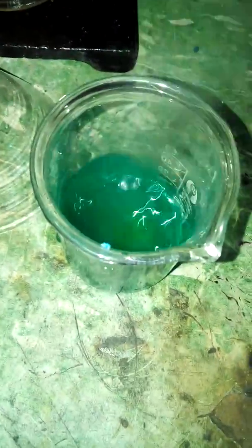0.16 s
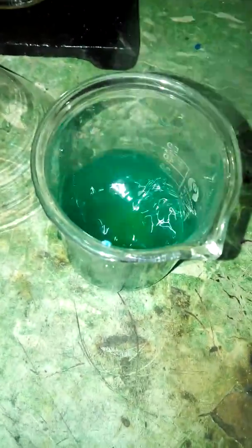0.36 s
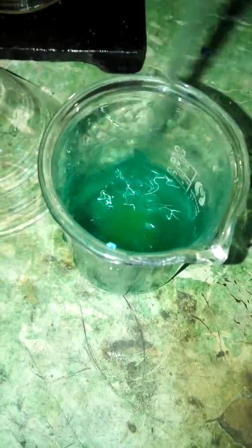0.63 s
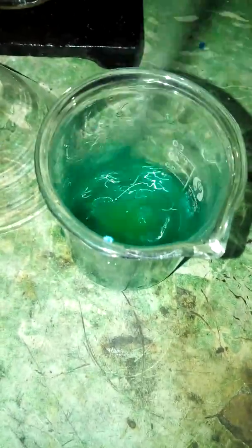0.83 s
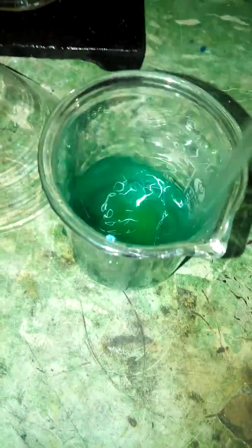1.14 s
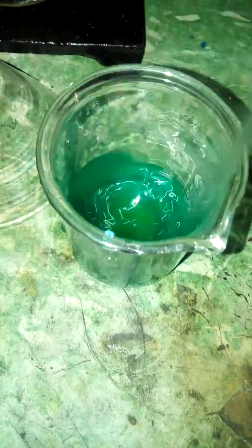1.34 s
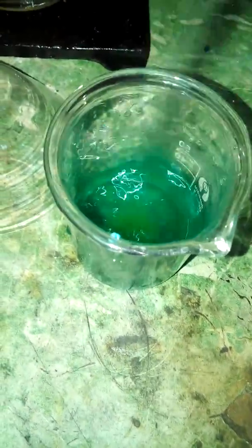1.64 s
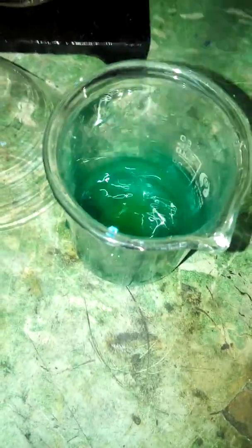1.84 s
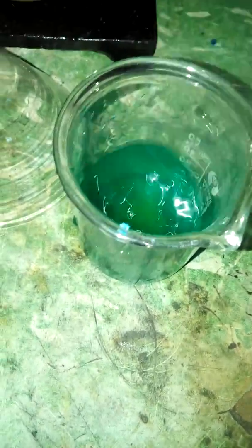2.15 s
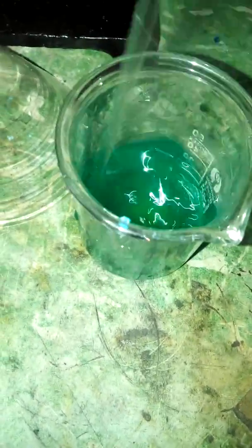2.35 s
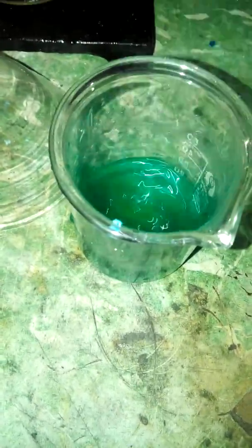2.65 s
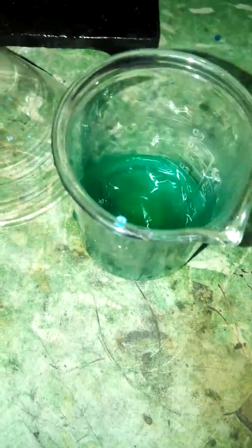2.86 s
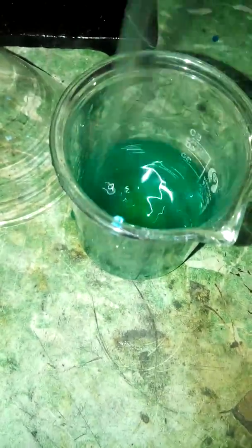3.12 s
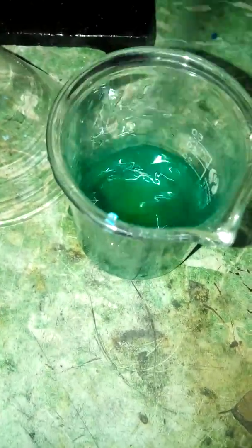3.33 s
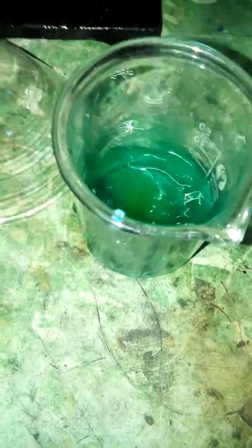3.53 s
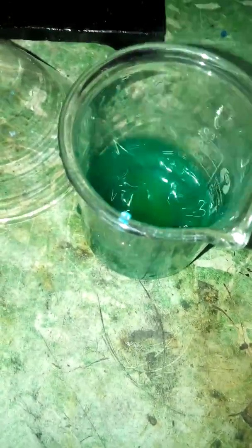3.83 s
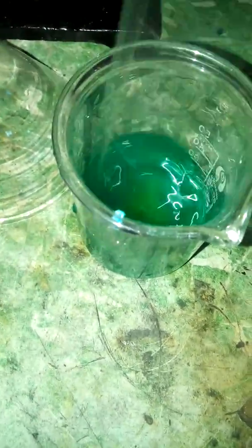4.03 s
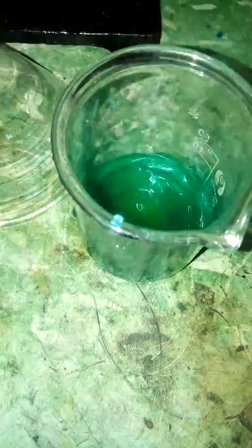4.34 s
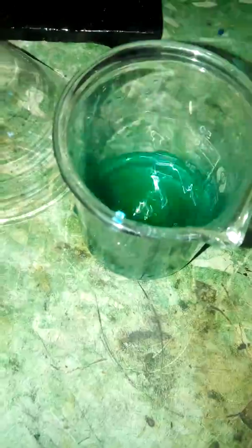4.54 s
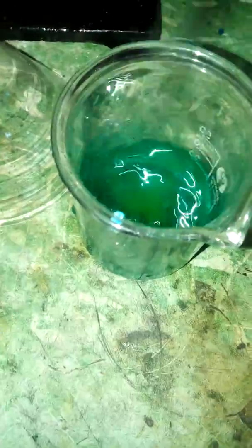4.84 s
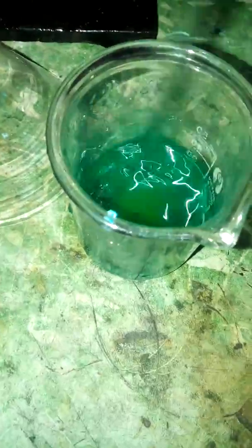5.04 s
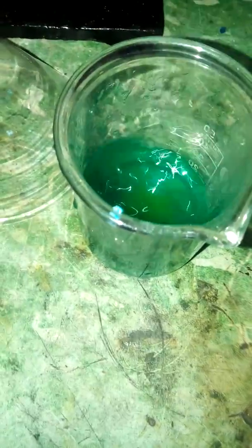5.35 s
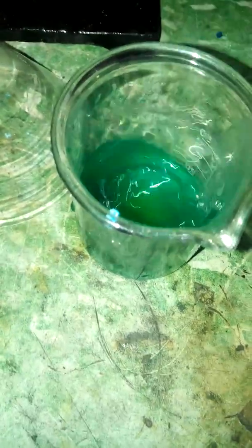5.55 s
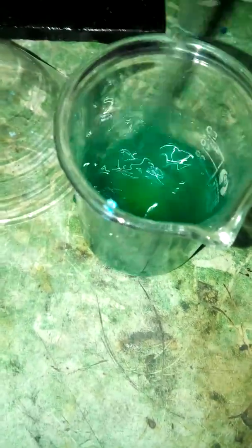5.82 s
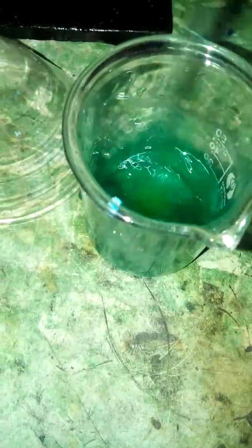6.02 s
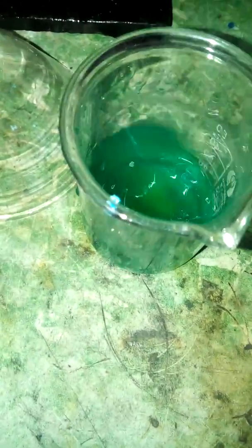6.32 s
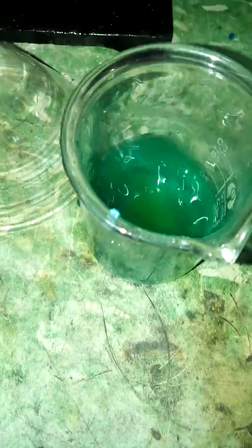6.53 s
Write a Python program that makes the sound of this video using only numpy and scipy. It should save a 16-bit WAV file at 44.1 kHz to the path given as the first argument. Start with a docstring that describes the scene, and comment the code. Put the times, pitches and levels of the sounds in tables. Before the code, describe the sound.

A rod clinks quickly and irregularly against a small glass beaker as liquid is stirred, with soft sloshing, bubbly plips and glassy rubbing.

```python
"""A rod stirs a solution in a small glass beaker on a stone counter, close by in a small quiet room.
From the start the rod clinks on the wall: damped glass modes and a crack, with rebounds after hard blows.
Between blows it rubs, slides and squeaks by tiny slips; the liquid sloshes, and trapped bubbles ring as they rise.
At 0.7, 2.3 and 2.6 s the foot knocks on the counter with a dull thud; just before 2.6 s come two clear squeaks.
The hardest blows fall near 2.4 and 3.5 s, and the rubbing is strongest near 6 s."""
import sys
import numpy as np
from scipy import signal
from scipy.fft import rfft, irfft
from scipy.io import wavfile

SR = 44100
rng = np.random.default_rng(int(sys.argv[2]) if len(sys.argv) > 2 else 0)


def unload_audio(sound):
    """Save the sound as a 16-bit wav file, at the path given as the first command line argument."""
    columns = np.transpose(np.atleast_2d(sound))
    # keep every value between -1 and 1, then stretch to whole-number steps
    steps = np.round(np.clip(columns, -1, 1) * 32767)
    wavfile.write(sys.argv[1], SR, steps.astype(np.int16))


N = 294588
EDGE_HZ = 16000  # upper limit of the band


def amp(db):
    """Decibel law: a level in dB as an amplitude ratio."""
    return 10 ** (np.asarray(db) / 20)


def evened(x):
    """Normalization to an rms of 1."""
    return x / np.sqrt(np.mean(x ** 2) + 1e-20)


def read(points, hz):
    """Interpolation of a spectrum on a log-frequency axis."""
    f, value = np.transpose(points)
    return np.interp(np.log(hz + 1), np.log(f + 1), value)


def curve(rows, axis=1):
    """Linear interpolation in dB: one column of a level curve, as a gain for every sample."""
    rows = np.array(rows)
    return amp(np.interp(np.arange(N) / SR, rows[:, 0], rows[:, axis]))


def add(mix, s, sound):
    """Superposition: adds a sound to the mix, in place, from time s [s]."""
    part = mix[max(round(s * SR), 0):][:len(sound)]
    part += sound[:len(part)]


def noise(spectrum, size):
    """Spectral shaping: white noise weighted by a spectrum, of rms 1."""
    weight = amp(read(spectrum, np.fft.rfftfreq(size, 1 / SR)))
    return evened(irfft(rfft(rng.standard_normal(size)) * weight, size))


def drift(rate_hz):
    """Low-pass random process: a wander of rms 1, slower than about rate_hz."""
    weight = np.exp(-(np.fft.rfftfreq(N, 1 / SR) / rate_hz) ** 2)
    return evened(irfft(rfft(rng.standard_normal(N)) * weight, N))


# the spectrum of the quiet air: (frequency [Hz], relative density [dB per Hz])
AIR_SPECTRUM = [(20, -29), (50, -5.5), (110, -2), (165, 6.5), (260, -1.5), (500, -20), (1000, -7),
                (2000, -40), (4500, -44), (9000, -40), (16000, -47)]


def air(level_db=-64):
    """Stationary random noise: the steady coloured hush of the room."""
    return amp(level_db) * noise(AIR_SPECTRUM, N)


# the reverberation time of the room: (frequency [Hz], t60 [s])
ROOM_DECAY = [(200, 0.5), (1400, 0.24), (3500, 0.34), (9000, 0.19), (15000, 0.19)]


def room(x, wet_db=-12, gap_s=0.001):
    """Reverberation: dense random echoes that die at a rate set by frequency."""
    echoes_per_s = 4000
    taps = rng.standard_normal(SR // 2) * (rng.random(SR // 2) < echoes_per_s / SR)
    hz, t, z = signal.stft(taps, SR, nperseg=256)
    decay = amp(-60 * t / read(ROOM_DECAY, hz)[:, None])
    tail = signal.istft(z * decay, SR, nperseg=256)[1]
    tail *= 1 - np.exp(-(np.arange(len(tail)) / SR / gap_s) ** 2)  # the echoes set in after the direct sound
    return x + amp(wet_db) * signal.fftconvolve(x, tail / np.linalg.norm(tail))[:N]


# the stirring rhythm: two strokes to a turn, the hand slowly speeding up
FIRST_STROKE_S, STROKE_S, QUICKEN_S_PER_STROKE = .176, .199, .00037


def strokes(count=34):
    """Uniformly quickening rhythm: the stroke times that pace the swirl [s]."""
    k = np.arange(count)
    return FIRST_STROKE_S + STROKE_S * k - QUICKEN_S_PER_STROKE * k ** 2 / 2


def swirl(depth_db=2.5, lead_turns=0.023):
    """Periodic modulation: the liquid surges once in every turn, a gain for every sample."""
    times = strokes()
    turns = np.interp(np.arange(N) / SR, times, np.arange(len(times)) / 2)
    return amp(-depth_db * np.cos(2 * np.pi * (turns + lead_turns)))


# the spectrum of the wash: (frequency [Hz], relative density [dB per Hz])
SLOSH_SPECTRUM = [(50, -42), (150, -1.5), (260, -4.5), (600, 3), (1100, -4), (1800, -7.5), (3000, -11.5),
                  (6000, -19)]
# how hard the stirring is: (time [s], relative level of rubbing [dB], relative level of sloshing [dB])
STIRRING = [(0.0, -57.5, -60), (0.59, -50, -61), (1.17, -47.5, -60.5), (1.43, -50.5, -61.5),
            (1.8, -51, -62), (2.25, -58.5, -62.5), (2.51, -49.5, -55), (2.88, -46, -65), (3.42, -53.5, -63),
            (3.89, -58, -66), (5.02, -56, -65.5), (5.71, -57, -67), (5.99, -44, -60), (6.36, -56, -65),
            (6.68, -55, -61)]


def slosh(wash_db=-3, lumps_db=3.5, gurgle_db=-3, per_s=4, cycles=6, count=24):
    """Turbulence and bubble resonance: a lumpy wash and many faint gurgles of all sizes."""
    wash = evened(noise(SLOSH_SPECTRUM, N) * amp(lumps_db * drift(16)))
    gurgle, t = np.zeros(N), np.arange(SR // 10) / SR
    for hz in np.geomspace(280, 4000, count):
        sizes = amp(1.4 * rng.standard_normal(N).clip(-2, 2))
        pops = (rng.random(N) < per_s / SR) * sizes
        age = hz * t / cycles
        rising_tone = np.sin(2 * np.pi * hz * t * (1 + 2 * t))
        gurgle += signal.oaconvolve(pops, age * np.exp(-2 * age) * rising_tone)[:N]
    return curve(STIRRING, axis=2) * swirl() * (amp(wash_db) * wash + amp(gurgle_db) * evened(gurgle))


# bubbles trapped behind the rod, from high plips to deep gulps:
# (onset [s], relative level [dB], starting pitch [Hz])
TRAPPED_BUBBLES = [(0.092, -45, 1500), (0.1735, -44, 1067), (0.2167, -44, 1620), (0.376, -30, 1340),
                   (0.392, -34, 1280), (0.5554, -37, 1590), (0.5662, -28, 1470), (0.753, -40, 1500),
                   (0.9667, -38.5, 1026), (1.9041, -34.5, 1497), (1.9614, -25.5, 1527), (2.241, -44, 215),
                   (2.3426, -32, 1506), (2.3697, -27, 1370), (2.558, -44.5, 401), (2.6574, -28.5, 1706),
                   (3.333, -31.5, 1626), (4.0752, -38.5, 1038), (5.224, -42, 1050), (5.4164, -28, 1400),
                   (5.42, -36, 1030), (5.6244, -43, 1103), (5.748, -46, 500), (6.104, -48, 536),
                   (6.549, -31, 1450)]


def bubbles(level_db=0.5, rise_cycles=2, satellite_db=-13, lag_s=0.045, count=4):
    """Bubble resonance: a damped tone rises as the bubble nears the surface, with fainter splashes around it."""
    out, t = np.zeros(N), np.arange(SR // 8) / SR
    life_cycles, glide_per_s = 9, 5  # decay to 1/e; relative rise in pitch
    for s, db, hz in TRAPPED_BUBBLES:
        group = [(s, hz, db)]
        for lag, pitch in rng.random((count, 2)):
            group.append((s + lag_s * (lag - .15), hz * 2 ** (.8 * pitch - .35), db + satellite_db))
        for start, pitch_hz, size_db in group:
            turns = pitch_hz * (t + glide_per_s * t ** 2 / 2)
            shape = (1 - np.exp(-turns / rise_cycles)) * np.exp(-turns / life_cycles)
            shape *= 1 - t / t[-1]
            add(out, start, amp(size_db + level_db) * shape * np.sin(2 * np.pi * turns))
    return out


def ring(modes, t, detune, scatter_db):
    """Modal synthesis: dying sines, heights of norm 1.

    Where the blow lands changes each mode's share, and the moving liquid its pitch."""
    hz, db, t60 = np.transpose(modes)[:, :, None]
    share, shift, phase = rng.standard_normal((3, len(modes), 1))
    height = amp(db + scatter_db * share)
    tones = np.sin(2 * np.pi * (hz * (1 + detune * shift) * t + phase))
    waves = np.exp(-np.log(1000) * t / t60) * tones
    return (height * waves).sum(0) / np.linalg.norm(height)


# each rebound comes sooner and softer
BOUNCE_S, BOUNCE_SHRINK, BOUNCE_DB = .0125, 0.62, -12.5


def bounces(uneven=.2, count=2):
    """Inelastic rebound: pairs of (delay [s], level relative to the blow [dB])."""
    k = np.arange(count)
    gaps = BOUNCE_S * BOUNCE_SHRINK ** k * np.exp(uneven * rng.standard_normal(count))
    return zip(np.cumsum(gaps), BOUNCE_DB * (k + 1))


# the beaker's foot on the counter: (onset [s], relative level of glass [dB], relative level of thud [dB])
FOOT_KNOCKS = [(0.6894, -35.5, -47), (2.293, -42, -58), (2.6275, -29.5, -33)]
# the modes of the foot: (nominal frequency [Hz], relative level [dB], t60 [s])
FOOT_MODES = [(1110, -9, 0.028), (1860, 0, 0.024), (2760, -5, 0.018), (3850, -7, 0.028)]
# the counter's answer: (frequency [Hz], relative density [dB per Hz])
THUD_SPECTRUM = [(30, -50), (200, -20), (560, 0), (780, -1.5), (1200, -9), (5000, -28)]


def knocks(level_db=6, thud_s=0.007, rise_s=0.00074):
    """Impact of glass on stone: damped foot modes and a dull thud, repeated as the beaker rocks."""
    out, t = np.zeros(N), np.arange(SR // 10) / SR
    onset = 1 - np.exp(-t / rise_s)
    for s, glass_db, thud_db in FOOT_KNOCKS:
        for delay, drop in [(0, 0), *bounces()]:
            thud = amp(thud_db) * noise(THUD_SPECTRUM, len(t)) * np.exp(-t / thud_s)
            foot = amp(glass_db) * ring(FOOT_MODES, t, detune=0.02, scatter_db=1.5)
            add(out, s + delay, amp(drop + level_db) * onset * (foot + thud))
    return out


# the beaker's modes, two of the rim, two of the wall, then the damped high ones; the spout splits
# the rim and wall modes into beating pairs: (nominal frequency [Hz], level within the family [dB], t60 [s])
GLASS_MODES = [(2576, -1.5, 0.25), (2614, -1.5, 0.22), (6470, 5.5, 0.1), (6408, -8, 0.16),
               (2772, -17.5, 0.027), (3620, -20, 0.03), (5120, -14, 0.016), (5823, -14.5, 0.034),
               (7384, 4, 0.017), (7500, 3.5, .018), (8940, -9.5, 0.051), (9540, 7, 0.028),
               (10150, -1, 0.024), (10600, -1, 0.02), (11450, -12.5, 0.027), (12250, -7, 0.026),
               (13630, -17, 0.029), (14300, -12.5, 0.025)]


def rim(t):
    """Beating of near-degenerate modes: the slow pair of the rim."""
    return ring(GLASS_MODES[:2], t, detune=.0035, scatter_db=3)


def wall(t):
    """Beating of near-degenerate modes: the higher pair of the wall."""
    return ring(GLASS_MODES[2:4], t, detune=.005, scatter_db=3)


# the crack of the contact itself: (frequency [Hz], relative density [dB per Hz])
CRACK_SPECTRUM = [(200, -40), (900, -31), (1900, -15), (3500, -10.5), (4400, -15.5), (5400, -2.5),
                  (6700, 0), (7500, 5.5), (10000, 1.5), (12600, -5.5), (16000, -9.5)]
TICK_HZ = 9000  # reference for the favoured pitch: the boost grows below it


def tick(favoured_hz=None, crack_db=-4.5, crack_s=0.0027, rise_s=0.00016, favour_db=6, octaves=.25):
    """Impact excitation: damped high modes and a crack, stronger near the pitch the contact point favours."""
    t = np.arange(SR // 16) / SR
    modes = np.array(GLASS_MODES[4:])
    if favoured_hz:
        nearness = np.exp(-(np.log2(modes[:, 0] / favoured_hz) / octaves) ** 2)
        modes[:, 1] += favour_db * nearness * (TICK_HZ / favoured_hz) ** .5
    glass = ring(modes, t, detune=.008, scatter_db=3.5)
    crack = amp(crack_db) * noise(CRACK_SPECTRUM, len(t)) * np.exp(-t / crack_s)
    sound = (glass + crack) * (1 - np.exp(-t / rise_s))
    return sound / np.sqrt(2 * np.mean(sound[:SR // 250] ** 2))  # as strong as a unit sine over 4 ms


def contact(flight_s=.04, hard_db=-24, flight_db=-12):
    """Loss of contact: before each hard blow the rod swings nearly free, a gain for the friction sounds."""
    touching = np.ones(N)
    for s, bright, *_ in ROD_BLOWS:
        if bright > hard_db:
            touching[max(int((s - flight_s) * SR), 0):int(s * SR)] = amp(flight_db)
    return touching


# the clear squeaks of the wet rod: (middle [s], frequency [Hz], level before contact gain [dB], length [s])
CLEAR_SQUEAKS = [(2.552, 9400, -21.5, 0.0082), (2.558, 9640, -24, 0.013)]


def squeaks(level_db=0, waver=.006, faint_db=-49, count=70):
    """Stick-slip oscillation: short tones at high modes, two clear and many faint, while the rod touches."""
    out, wobble = np.zeros(N), drift(300)
    high_hz = np.array(GLASS_MODES)[9:13, 0]
    tones = list(CLEAR_SQUEAKS)
    for when, mode, off, size, span in rng.random((count, 5)):
        hz = high_hz[int(mode * len(high_hz))] * (.98 + .04 * off)
        tones.append((when * (N / SR - .1), hz, faint_db + 12 * (size - .5), .003 + .006 * span))
    for s, hz, db, length in tones:
        size = int(length * SR)
        turns = np.cumsum(hz * (1 + waver * wobble[int(s * SR):][:size])) / SR
        add(out, s - length / 2, amp(db + level_db) * np.hanning(size) * np.sin(2 * np.pi * turns))
    return out * contact()


# the gritty slides of the wet rod: (middle [s], centre frequency [Hz], relative level [dB])
GRITTY_SLIDES = [(.657, 3100, -44), (.874, 3100, -46), (1.111, 6240, -39.5), (1.278, 3000, -48),
                 (2.167, 8370, -39), (2.336, 4000, -47), (3.19, 6640, -48.5), (3.325, 6400, -53),
                 (3.69, 8000, -52), (3.892, 8500, -45), (4.075, 9000, -45.5), (4.25, 7500, -47),
                 (4.45, 8500, -46), (4.635, 9300, -49), (5.897, 2900, -45), (6.296, 8300, -43),
                 (6.48, 4300, -47)]


def slides(level_db=-1.5, octaves=0.28, life_s=0.0005, glass_db=0, count=40):
    """Granular friction: a spatter of tiny damped tones that also sets the high modes tinkling."""
    out, t = np.zeros(N), np.arange(SR // 40) / SR
    length_s = .026
    for s, centre_hz, db in GRITTY_SLIDES:
        spatter = np.zeros(SR // 10)
        for when, pitch, size in rng.standard_normal((count, 3)).clip(-2, 2):
            hz = min(centre_hz * 2 ** (octaves * pitch), EDGE_HZ)
            grain = size * t * np.exp(-t / life_s) * np.sin(2 * np.pi * hz * t)
            add(spatter, length_s * (.5 + when / 4), grain)
        glass = ring(GLASS_MODES[4:], t, detune=.006, scatter_db=3)
        tinkle = signal.fftconvolve(spatter, glass / np.linalg.norm(glass))[:len(spatter)]
        spatter = spatter + amp(glass_db) * tinkle
        strength = np.sqrt(np.sum(spatter ** 2) / (length_s * SR))
        add(out, s - length_s / 2, amp(db + level_db) * spatter / strength)
    return out


def rubbing(merge=1.0, bright_db=-2.5, rim_db=-6.5, wall_db=-7.5, count=8):
    """Friction as random impulses: slips in short spells, merging into a glassy rustle as the rod presses harder."""
    t = np.arange(SR // 3) / SR
    pressure = curve(STIRRING)
    rate = 550 * (pressure / np.median(pressure)) ** merge  # slips per second
    sizes = amp(3 * np.minimum(rng.exponential(1, N), 3))
    slips = (rng.random(N) < rate / SR) * sizes / np.sqrt(rate)
    spells = amp(6 * drift(22).clip(-2, 1.6))
    slips = evened(slips * spells) * contact() * pressure
    place, out = rng.integers(0, count, N), np.zeros(N)  # each slip falls on one of a few places
    for k in range(count):
        body = np.zeros(len(t))
        soft_tick = tick(crack_db=-1.5)
        for db, part in ((bright_db, soft_tick), (rim_db, rim(t)), (wall_db, wall(t))):
            add(body, 0, amp(db) * part / np.linalg.norm(part))
        out += signal.oaconvolve(slips * (place == k), body)[:N]
    return out


# the clear blows of the rod: (time [s], relative level of tick [dB], of rim ring [dB], of wall ring [dB],
# and, where the point of contact colours the tick, favoured frequency [Hz])
ROD_BLOWS = [(0.1207, -17, -54, -52), (0.1365, -26, -62, -58), (0.168, -19, -56, -53),
             (0.2146, -24.5, -58, -43.5), (0.296, -24.5, -72, -47), (0.3744, -7, -45, -38, 9700),
             (0.4742, -18.5, -27.5, -46), (0.5687, -4.5, -44, -38, 7200), (0.6475, -20.5, -44.5, -36),
             (0.6881, -25.5, -35, -53), (0.7584, -4, -38.5, -39, 7200), (0.8884, -23, -36.5, -41),
             (0.9691, -7.5, -36, -39, 7200), (1.055, -19.5, -39, -38), (1.0894, -25, -42.5, -38),
             (1.1806, -13.5, -46.5, -48), (1.2845, -28, -40, -44), (1.3842, -11, -48, -56, 3600),
             (1.4134, -20, -43.5, -58), (1.4914, -29, -27.5, -45), (1.5741, -8, -40.5, -37, 3600),
             (1.6407, -22, -46.5, -40), (1.6792, -23.5, -45, -43), (1.757, -17, -56, -51, 7200),
             (1.9044, -32, -35.5, -41), (1.9627, -4, -33.5, -45), (2.1057, -17.5, -58.5, -46, 7200),
             (2.1195, -24, -62, -52), (2.3518, -2.5, -46, -25, 3100), (2.5179, -15, -54, -47),
             (2.6251, -23, -45.5, -30.5), (2.7279, -8.5, -44.5, -43), (2.8144, -22.5, -61, -42),
             (2.862, -34, -45, -52), (2.9215, -11, -55, -32, 4000), (3.0081, -33, -39, -47),
             (3.1007, -11, -33.5, -49), (3.3091, -28, -41.5, -41.5), (3.411, -34, -38.5, -44.5),
             (3.5018, -2.5, -33, -21, 9500), (3.7592, -24, -42, -51), (3.96, -38, -48, -48),
             (4.128, -35, -45.5, -53.5), (4.1646, -24, -46.5, -50), (4.3207, -24, -44, -40),
             (4.353, -30, -54, -52), (4.5129, -28.5, -49, -44.5), (4.551, -32, -56, -54),
             (4.65, -24, -58, -34.5), (4.7109, -24, -42.5, -40), (4.748, -22.5, -47.5, -49),
             (4.839, -10.5, -42, -32, 9500), (5.023, -10, -41.5, -26.5, 9500), (5.1114, -31, -49, -41),
             (5.2079, -15.5, -53, -46), (5.4176, -6.5, -43, -30), (5.6068, -21, -56, -38),
             (5.7094, -32, -49, -40), (5.732, -35, -47, -48), (5.7929, -8.5, -42, -31, 9500),
             (5.8674, -24, -44, -44), (5.8921, -26, -41, -40, 2900), (5.9722, -17.5, -50, -39, 9500),
             (6.0776, -18, -38, -32, 3100), (6.134, -26, -38, -45), (6.2504, -23, -50, -49),
             (6.294, -33, -42, -50), (6.3215, -30, -58, -54), (6.4396, -23, -51, -52),
             (6.4786, -26, -33.5, -59), (6.543, -8, -37.5, -33)]
HARD_DB = -18  # tick level in the table above which a blow rebounds


def clinks(tick_db=-7, rim_db=0.8, wall_db=2, rise_s=0.000067, delay_s=.0005):
    """Modal excitation by impact: where a blow lands sets its tick, rim and wall ring; hard blows rebound."""
    out, t = np.zeros(N), np.arange(SR // 3) / SR
    onset = 1 - np.exp(-t / rise_s)
    for s, bright, on_rim, on_wall, *favoured in ROD_BLOWS:
        start = s + delay_s
        add(out, start, amp(bright + tick_db) * tick(*favoured))
        ringing = amp(on_rim + rim_db) * rim(t) + amp(on_wall + wall_db) * wall(t)
        add(out, start, onset * ringing)
        if bright > HARD_DB:
            for delay, db in bounces():
                add(out, start + delay, amp(bright + tick_db + db) * tick())
    return out


def scene():
    """Superposition: liquid, knocks and glass in the room, over its quiet air."""
    low = room(bubbles() + knocks() + slosh(), wet_db=-5.0)
    glass = room(clinks() + rubbing() + slides() + squeaks(), wet_db=-10.5)
    return (glass + low + air())[None]


def record(dry):
    """Band limitation: a linear-phase low-pass filter at EDGE_HZ."""
    low_pass = signal.firwin(161, EDGE_HZ, window=("kaiser", 8), fs=SR)
    return signal.oaconvolve(dry, low_pass[None], "same")


dry = scene()
out = record(dry)
unload_audio(out)
```